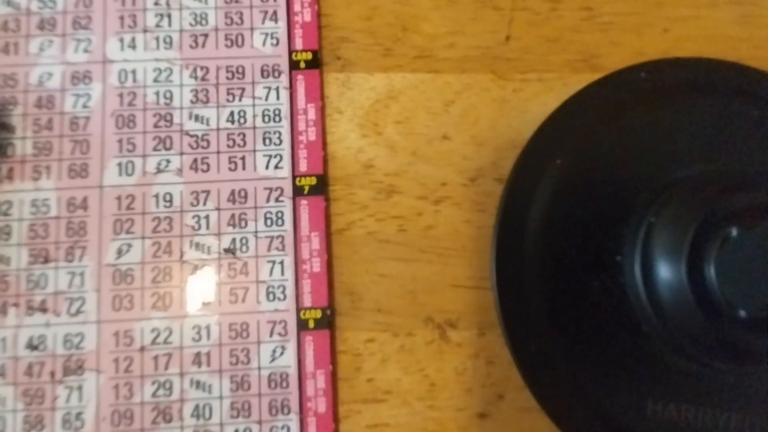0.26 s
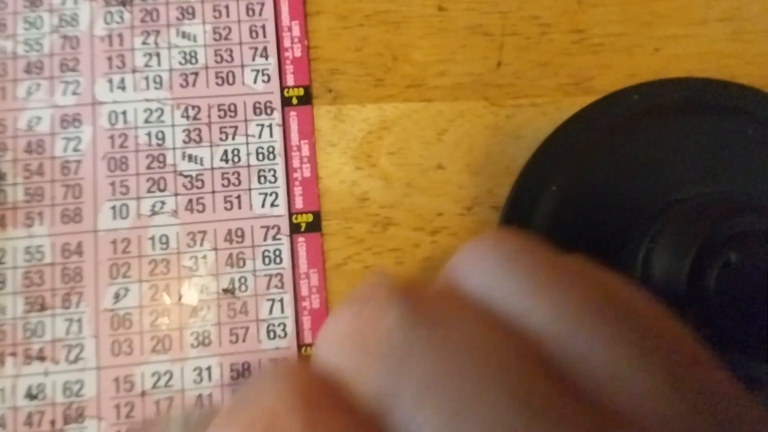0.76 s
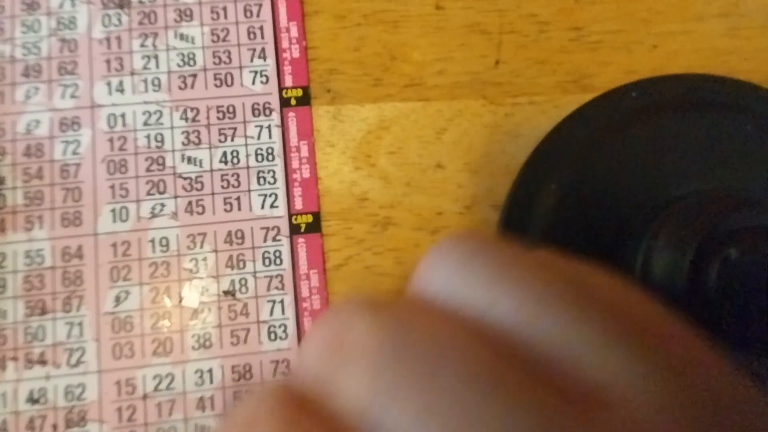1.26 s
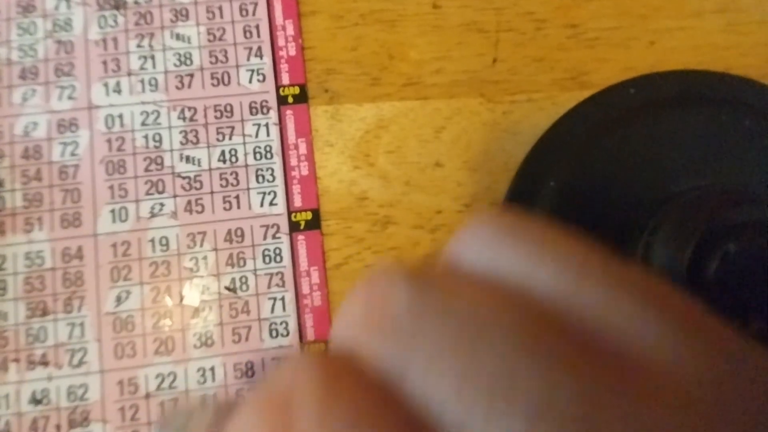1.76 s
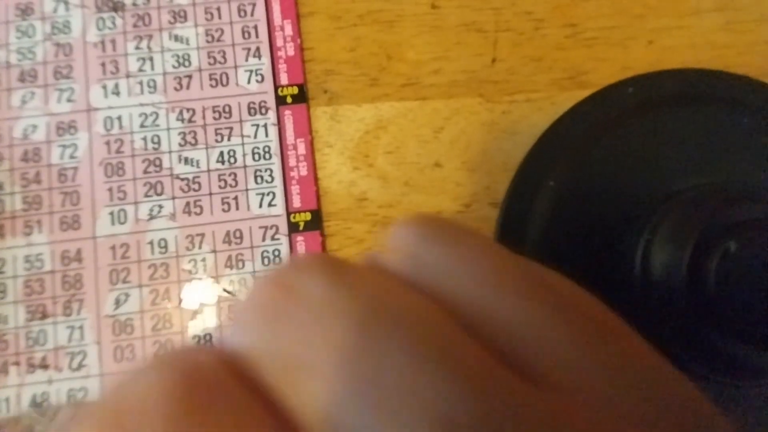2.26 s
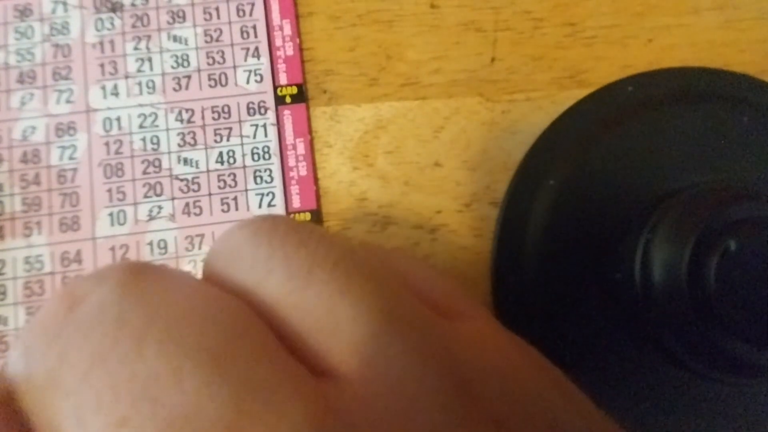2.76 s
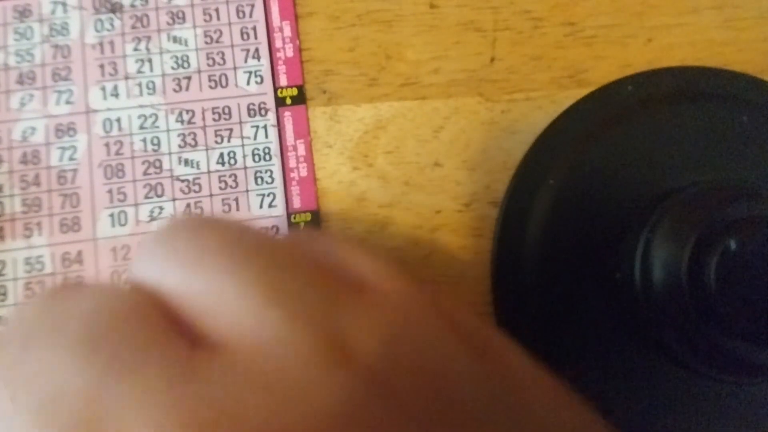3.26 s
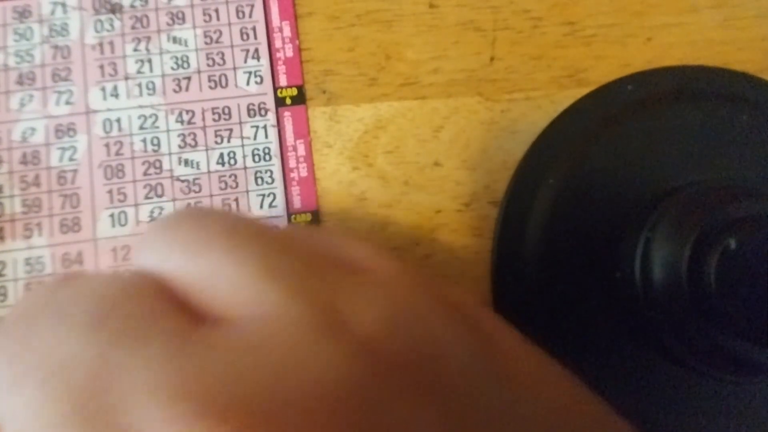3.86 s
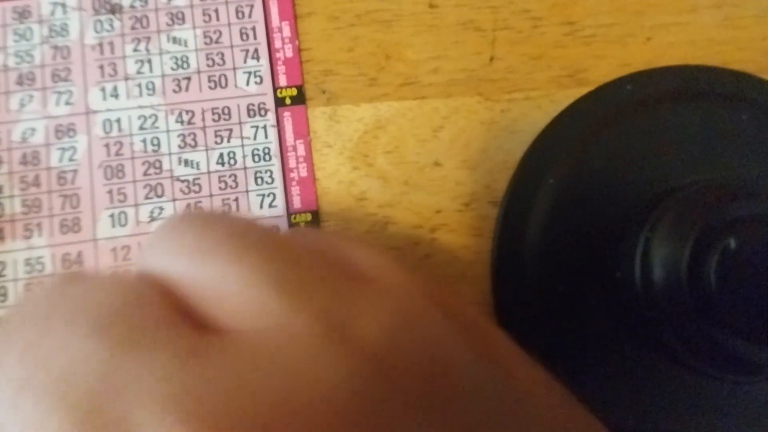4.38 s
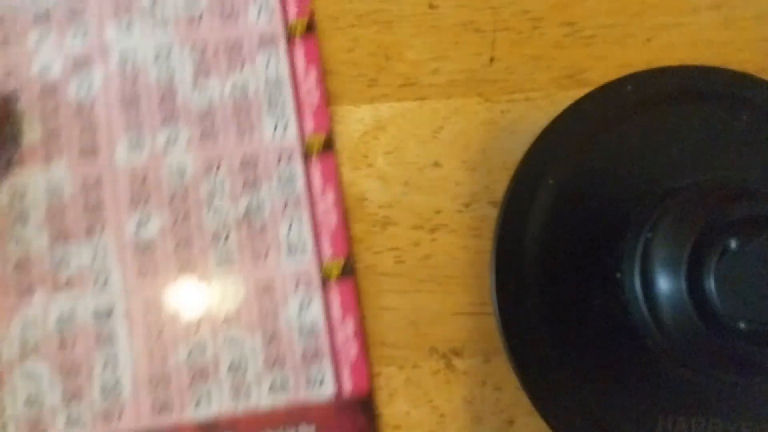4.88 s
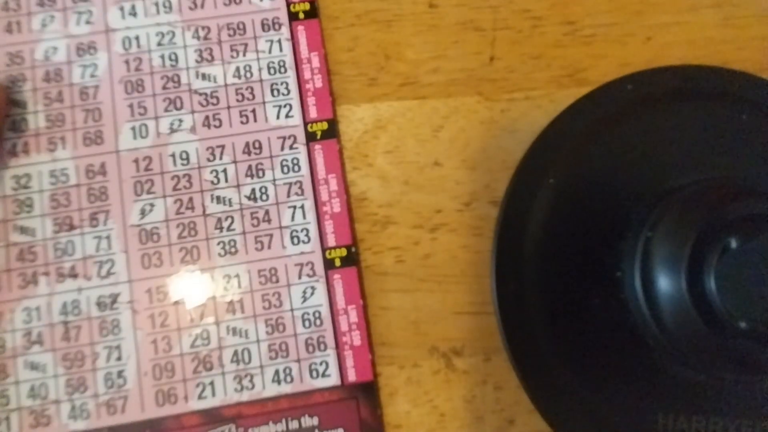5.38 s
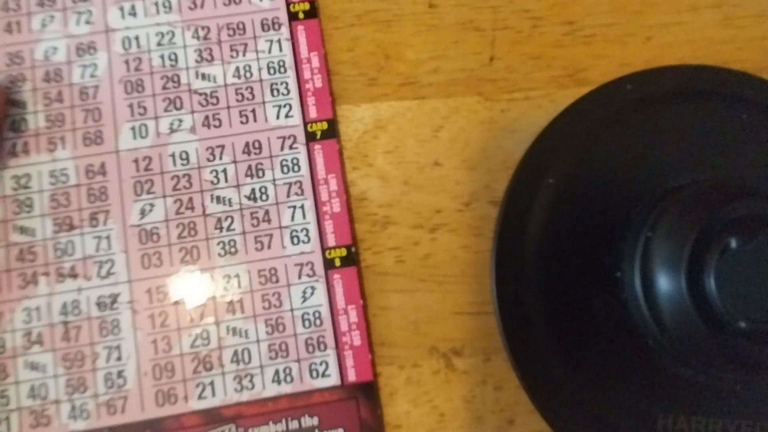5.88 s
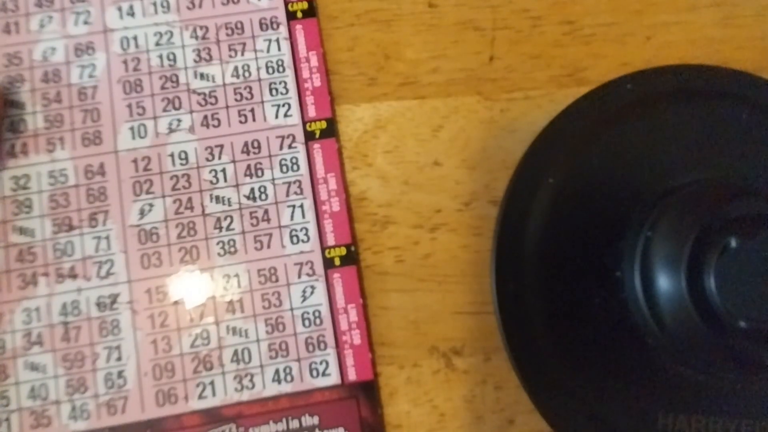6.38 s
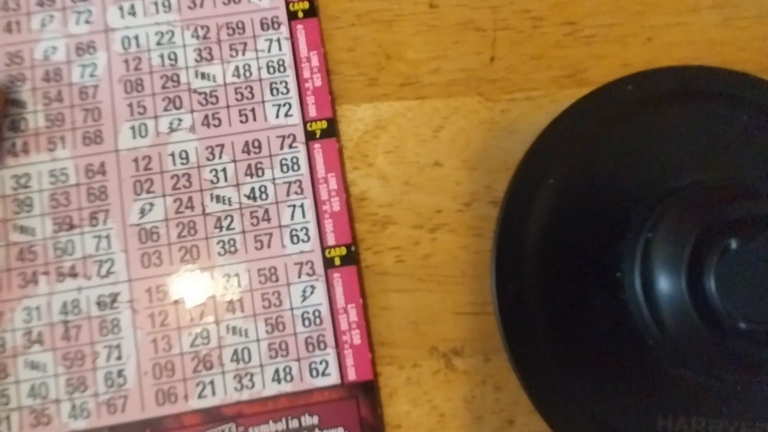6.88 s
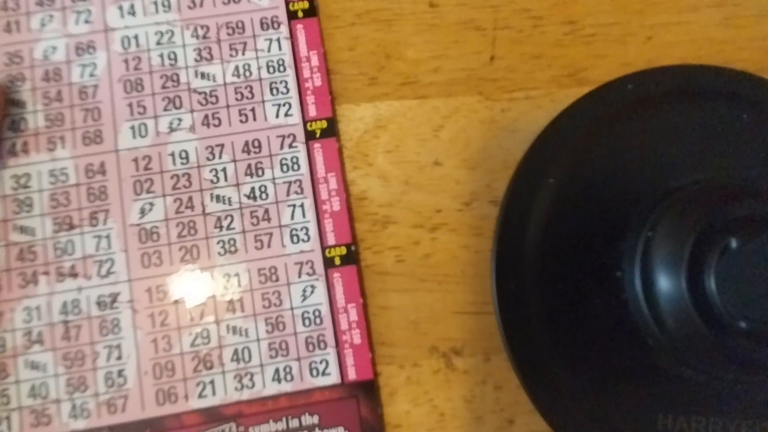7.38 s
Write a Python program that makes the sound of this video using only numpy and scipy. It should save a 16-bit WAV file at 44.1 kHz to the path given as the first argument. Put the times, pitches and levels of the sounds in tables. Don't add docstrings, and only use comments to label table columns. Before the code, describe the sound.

A coin taps and snaps on a wooden table, scratches a coated card in two rapid bursts, then knocks and bumps over a low hum.

```python
import sys
import numpy as np
from scipy import signal
from scipy.fft import rfft, irfft, next_fast_len
from scipy.io import wavfile

SR = 44100
rng = np.random.default_rng(int(sys.argv[2]) if len(sys.argv) > 2 else 0)


def int16_out(signal):
    q = np.round(np.clip(np.atleast_2d(signal).T, -1, 1) * 32767)
    wavfile.write(sys.argv[1], SR, q.astype(np.int16))


def boost_factor(decibels):
    exponent = np.asarray(decibels, float) / 20
    return 10 ** exponent


N = 336483
SIZE = next_fast_len(N + SR // 2)
TIME = np.arange(N) / SR

# multiple_of_cycle, level_db (rms)
ENGINE_ORDERS = [(6, -60), (9, -68), (12, -69), (15, -65.5), (18, -58), (21, -76), (24, -54.0), (27, -66.5),
                 (28, -75.5), (29, -57.5), (30, -47.5), (31, -59), (32, -60.5), (33, -49.5), (35, -59.5),
                 (36, -73), (41, -74.5), (42, -72.5), (45, -65.5), (47, -62.5), (48, -70.5)]
# pitch_hz, level_db_per_hz
AIR_SPECTRUM = [(40, -88), (60, -81), (130, -80.5), (215, -73.5), (330, -81), (600, -90.5), (700, -100),
                (1000, -102), (1170, -110), (2150, -104), (2750, -108), (3200, -116), (4300, -117),
                (5800, -126)]
# pitch_hz, level_db_per_hz
HISS_SPECTRUM = [(3000, -135), (5800, -128), (6800, -123), (8580, -133), (12000, -128), (15000, -131),
                 (17000, -140)]
# pitch_hz, likeness (-1 to 1)
AIR_LIKENESS = [(50, -0.073), (110, 0.76), (200, 0.89), (330, 0.91), (640, 0.33), (1000, -0.084),
                (1410, -0.29), (3100, -.09), (7000, -0.18)]
# middle_s, length_s, level_db
TRAFFIC_SWELLS = [
    (0.855, 0.93, -63),
    (1.19, 0.17, -63.5),
    (2.202, .2, -64.5),
    (2.726, 0.4, -46.5),
    (3.513, 0.34, -53),
    (4.155, 0.41, -54.5),
    (4.91, .3, -50),
    (5.65, .2, -65.5),
    (6.504, 0.72, -59),
    (7.62, .15, -50.5),
]
# pitch_hz, t60_s
ROOM_T60 = [(200, 0.21), (1000, 0.3), (5000, 0.22), (14000, 0.21)]
# middle_s, length_s, level_db, brightness_db, body_db
DRAGS = [
    (1.24, 1.05, -89, 8, 0.5),
    (3.93, 1.22, -88, 4, 3),
    (.13, 0.18, -69.5, -1.5, 2.5),
    (3.24, 0.085, -65, -6, 10),
    (4.662, 0.09, -69, 5, 2),
    (4.732, 0.076, -70, 5, 1.5),
    (4.87, 0.1, -58, -1, -3),
    (4.935, .085, -58, -1, -7),
    (4.79, .05, -72, 3, 0),
    (2.241, 0.14, -74.5, -0.5, 5.5),
]
# start_s, level_db, fade_db_per_s, brightness_db, body_db
SKIDS = [
    (.5, -59.5, 157, 2.5, -13.5),
    (1.715, -62, 297, -5.5, -4.5),
    (3.2, -66.5, 900, -6, 9.5),
    (4.424, -69, 130, -13, 11.5),
    (6.24, -72.5, 269.5, -3.5, -4),
    (6.499, -68, 102.5, -8.5, 8.5),
    (6.78, -76, 89, -9, 5.5),
    (7.565, -71, 202.5, -2, -10),
]
# pitch_hz, level_db_per_hz
SLIDE_SPECTRUM = [(1100, -30), (1880, -14), (2600, -8), (3200, -4), (4200, -7), (5670, -4), (6760, 0),
                  (7600, -4), (8500, -16.5), (11000, -39.5), (18700, -120)]
# pitch_hz, level_db_per_hz
SHEEN_SPECTRUM = [(5000, -34), (8500, -9), (10600, -3.5), (12800, -0.5), (15000, -3.5), (16000, -10.5)]
# pitch_hz, level_db_per_hz
BODY_SPECTRUM = [(410, -30.5), (700, -1.5), (760, -16.5), (999, -12), (1190, -18), (2400, -15), (3200, -28),
                 (4160, -43), (7040, -120)]
# middle_s, length_s, level_db
RUBS = [
    (4.66, 0.12, -67),
    (7.12, .2, -79.5),
    (6.33, .15, -81.5),
]
# start_s, pitch_hz, peak_db, t60_s, left_right_db
PINGS = [(.4393, 900, -21, .016, -6), (.4415, 480, -26, .04, -9), (.4305, 700, -30, .025, -8),
         (.4455, 1250, -32, .02, -6), (.497, 3500, -54, .08, 0), (.698, 4800, -52, .012, 0),
         (3.197, 760, -24, .022, 0), (3.1985, 2050, -33, .018, 3), (3.199, 1600, -36, .04, 3),
         (4.644, 2000, -58, .015, 0), (4.809, 2600, -42, .008, 0), (4.836, 2300, -46, .015, 0),
         (6.4965, 1930, -48, .025, 0), (6.4965, 4300, -48, .01, 0), (6.55, 900, -50, .04, 0),
         (6.817, 2000, -61, .02, 0), (.793, 1200, -58, .02, 0), (3.456, 750, -42, .04, 0),
         (.821, 760, -46, .04, 0), (3.742, 1700, -50, .02, 0), (3.647, 1300, -50, .02, 0),
         (3.833, 1500, -50, .02, 0), (1.513, 1850, -50, .02, 0), (1.705, 2050, -45, .02, 0),
         (4.459, 1000, -46, .04, 0)]
# start_s, peak_db, body_db (over the peak), left_right_db
TICKS = [(.112, -46, 1.5, -1), (.162, -49, 2, -13), (.417, -50, 4, 8), (.4196, -54, 8, 0),
         (.4288, -30, -2, -2), (.439, -44, 14.5, 0.5), (.4444, -41, 7, 12), (.4732, -38, -1, -0.5),
         (.698, -65, 16.5, 10.5), (1.115, -52, -4, 7), (1.311, -45, -8, 4), (1.66, -55, -6, -4),
         (1.696, -46, -7, -5), (1.727, -43, -4, 11), (1.9971, -47, -3, 4.5), (3.1927, -41, 13, 3.5),
         (4.127, -54, 0, -2.5), (4.2537, -52, 0, -1), (4.332, -58, 4, 0), (4.427, -60, 3, 0),
         (3.41, -57, -9, 0), (.96, -58, 5, 0), (4.447, -56, -8, -9), (4.5156, -57, 0, -14),
         (4.527, -59, -10.5, -13), (4.622, -66, -3.5, -20.5), (4.6444, -54, 0.5, -18), (4.809, -38, 6, 4),
         (4.8265, -34.5, 3, 1.5), (6.496, -42, 3, -10.5), (6.523, -50, 0, -5.5), (7.058, -58.5, -2.5, -5),
         (7.5936, -54, -10.5, -0.5)]
# start_s, peak_db
CRACKLES = [(1.353, -53), (1.5054, -51), (1.5463, -53), (1.7673, -48.5), (1.86, -55.5), (1.938, -54),
            (4.102, -49), (4.1235, -56), (4.2096, -52), (4.2883, -47.5), (5.047, -55), (5.0868, -53),
            (5.128, -51.5), (5.228, -55.5), (5.4933, -53.5), (5.6, -52.5), (6.341, -55), (6.359, -52.5),
            (6.397, -57.5), (6.4358, -58), (6.5713, -48), (6.5953, -47), (6.6366, -54), (6.845, -55),
            (6.863, -50), (6.957, -63), (7.1165, -59.5)]
# start_s, peak_db
GRIT = [(3.3694, -57), (3.4572, -59.5), (3.626, -64), (3.652, -61), (3.7276, -62), (3.7402, -54),
        (3.8457, -58), (4.7744, -62), (6.7844, -65.5), (7.5717, -62)]
# start_s, knock_db, thud_db, clatter_db, softness_hz (lower is softer)
BLOWS = [(.4208, -28, -36, -38, 500), (0.429, -31, -48, -36, 2470), (0.439, -26, -50, -33, 2750),
         (0.445, -41, -41, -51, 2000), (0.4483, -38.5, -60, -40.5, 1210), (0.4931, -50, -56, -34, 1500),
         (0.794, -60, -52.5, -62, 1480), (0.82, -43, -40, -51, 1100), (1.995, -55, -63.5, -58, 2500),
         (3.1963, -27.5, -49, -31, 2600), (4.459, -31.5, -43, -36, 1180), (4.468, -35.5, -45.5, -47, 710),
         (4.809, -40, -60, -53, 4000), (4.83, -28.5, -64, -40.5, 1510), (4.837, -44, -56.5, -46, 3520),
         (4.845, -28, -28, -44.5, 790), (5.065, -45, -36.5, -61, 400), (6.312, -53, -34, -72, 410),
         (6.497, -51, -62.5, -50, 4140), (6.5248, -17, -29, -44, 295), (6.5353, -20, -51, -37, 300),
         (6.552, -51, -45, -51.5, 1500), (6.568, -42, -33, -49.5, 600), (6.817, -52, -38.5, -53, 399)]
# pitch_hz, level_db, t60_s
TABLE_MODES = [(222.3, -1.5, 0.074), (328, 1.5, 0.011), (623, -6, 0.06), (1290, -21.5, 0.0077),
               (1770, -6, 0.021), (2037, -8.5, 0.03)]
# pitch_hz, level_db, t60_s
THUD_MODES = [(77, -16.5, .1), (109.5, -4.5, 0.15), (145, -6, .08)]
# pitch_hz, level_db, t60_s
CARD_RING_MODES = [(345, -6, .1), (694, -9, .06), (937, -8, .07), (1007, -3, .12), (1200, -12, .05),
                   (1450, -10, .03), (1680, -8, .04), (1900, -6, .025), (2190, -2, .03), (2420, -13, .02)]
# pitch_hz, level_db, t60_s
SNAP_MODES = [(3900, -25, .006), (4670, -14, 0.0031), (5194, -23.5, .008), (6364, -14.5, 0.0067),
              (7010, 6, 0.0038), (8500, 3, .003), (9900, -3, 0.0077), (11370, 4.5, 0.0051),
              (13100, -14, 0.0052), (15000, -14, .005)]
# middle_s, length_s, rasp_db, tearing_db (over the rasp), card_mode_hz (under the coin)
STROKES = [(.836, .047, -58, -11, 1580), (.94, .092, -53.5, -8, 2100), (1.042, .076, -53.5, -12, 1650),
           (1.138, .079, -51.5, -7, 1750), (1.239, .085, -47, -12, 1500), (1.329, .053, -46.5, -8, 1900),
           (1.43, .079, -54.5, -12, 1600), (1.53, .061, -52.5, -7, 1850), (1.62, .065, -50.5, -12, 1700),
           (1.718, .068, -49.5, -7, 2050), (1.811, .073, -56.5, -12, 1640), (3.357, .086, -58, 0, 2300),
           (3.457, .044, -55, -6, 1500), (3.555, .069, -55.5, -1, 1870), (3.656, .051, -51, -7, 1750),
           (3.76, .063, -51, -1, 2000), (3.852, .052, -51.5, -6, 1500), (3.96, .058, -54.5, -1, 1600),
           (4.057, .066, -54, -5, 1630), (4.163, .065, -53.5, 0, 2100), (4.249, .048, -52, -6, 1550),
           (4.35, .039, -57, -1, 1950)]
# pitch_hz, level_db_per_hz
RASP_SPECTRUM = [(290, 3), (500, 0.5), (822, -8.5), (1010, -1.5), (1170, -3), (1550, -3.5), (1990, -6),
                 (2200, -7), (3200, -14), (4160, -67), (7040, -120)]
# pitch_hz, level_db_per_hz
BITE_SPECTRUM = [(1760, -42.5), (3000, -29), (3310, -3), (5140, -2), (6090, -5.5), (7510, -2),
                 (8050, -18.5), (8760, -5), (9730, -23), (10500, -9), (11800, -12.5), (13500, -18),
                 (16000, -14.5)]
# pitch_hz, width_hz, upper_patch_db, lower_patch_db, extra_on_push_db
CARD_MODES = [
    (787.1, 193, 6, -1, -3),
    (1006.7, 26, -10, -12, 6),
    (2250, 142, -8, -8, 3),
]
# pitch_hz, width_hz, level_db
MICROPHONE = [
    (1147, 120, -4.5),
    (3250, 1800, -5),
    (4380, 1000, 5.5),
    (8670, 1200, -7.5),
]


def rms_one(x):
    return x / np.sqrt(np.mean(x ** 2) + 1e-20)


def at_hz(points, hz):
    return np.interp(np.log(hz + 1), np.log(np.array(points)[:, 0]), np.array(points)[:, 1])


def coloured(x, spectrum):
    gain = boost_factor(at_hz(spectrum, np.fft.rfftfreq(SIZE, 1 / SR)))
    return irfft(rfft(x, SIZE) * gain, SIZE)[..., :N]


def drift(rate):
    r = np.exp(-80 * np.pi * rate / SR)
    slow = signal.lfilter([1], [1, -2 * r, r * r], rng.standard_normal(N // 40 + 2002))[2000:]
    return np.interp(np.arange(N) / 40, np.arange(len(slow)), rms_one(slow))


def hump(middle, width, squareness):
    out = np.zeros(N)
    near = slice(max(round((middle - 6 * width) * SR), 0), round((middle + 6 * width) * SR))
    out[near] = np.exp(-.5 * np.abs((TIME[near] - middle) / width) ** squareness)
    return out


def ring(clicks, modes):
    out = 0
    for hz, db, t60 in modes:
        r, w = boost_factor(-60 / (t60 * SR)), 2 * np.pi * hz / SR
        out = out + signal.lfilter([0, boost_factor(db) * np.sin(w)], [1, -2 * r * np.cos(w), r * r], clicks + 1e-18)
    return out


def resonance(x, hz, width_hz):
    r = np.exp(-np.pi * width_hz / SR)
    poles = [1, -2 * r * np.cos(2 * np.pi * hz / SR), r * r]
    return signal.lfilter([(1 - r * r) / 2, 0, (r * r - 1) / 2], poles, x)


def grains(per_s, spread_db):
    sizes = boost_factor(spread_db * np.minimum(rng.exponential(1, N), 5)) * rng.choice([-1, 1], N)
    return rms_one(sizes * (rng.random(N) < per_s / SR))


def left_right(pan_db):
    return np.array([[pan_db / 2], [-pan_db / 2]])


def ports(x, left_late_s, pan_db):
    left = np.interp(TIME - left_late_s, TIME, x)
    return np.array([left * boost_factor(pan_db / 2), x * boost_factor(-pan_db / 2)])


def engine():
    cycle_hz, crest_s = 6.878, -.0119
    wall_mode_hz, wall_half_width_hz, wall_lag = 235, 12, 1.5
    turn = 2 * np.pi * cycle_hz * (TIME - crest_s + .0001 * drift(1.0))
    order, db = np.transpose(ENGINE_ORDERS)
    lag = wall_lag * (np.arctan((order * cycle_hz - wall_mode_hz) / wall_half_width_hz) + np.pi / 2)
    hum = sum(boost_factor(level) * np.cos(k * turn - late) for k, level, late in zip(order, db, lag))
    return -np.sqrt(2) * hum * boost_factor(.5 * drift(1.5))


def air():
    rumble_bed_db = -64.5
    mid, side = rfft(rng.standard_normal((2, N)), SIZE)
    alike = np.clip(at_hz(AIR_LIKENESS, np.fft.rfftfreq(SIZE, 1 / SR)), -.9, .99)
    pair = irfft(np.sqrt(1 + alike) * mid + np.sqrt(1 - alike) * side * [[1], [-1]], SIZE)[:, :N]
    per_hz = np.sqrt(SR / 2)
    hiss = coloured(rng.standard_normal((2, N)), HISS_SPECTRUM) * boost_factor(5.5)
    low = signal.sosfilt(signal.butter(2, [50, 85], "band", fs=SR, output="sos"), pair)
    swell = boost_factor(rumble_bed_db - 6)
    for middle, length, db in TRAFFIC_SWELLS:
        swell = swell + boost_factor(db - 8.5) * hump(middle, 0.56 * length, 2)
    return per_hz * (coloured(pair, AIR_SPECTRUM) * boost_factor(drift(6)) + hiss) + swell * rms_one(low)


def room(x):
    t, tail = TIME[:SR // 2], 0
    for hz in 150 * 2. ** np.arange(7):
        edges = [hz / np.sqrt(2), hz * np.sqrt(2) * (1 + 0.1 * (hz > 9000))]
        band = signal.butter(2, edges, "band", fs=SR, output="sos")
        noise = signal.sosfilt(band, rng.standard_normal((2, len(t))))
        tail = tail + noise * boost_factor(-60 * t / at_hz(ROOM_T60, hz))
    tail = tail * np.clip(t / .007, 0, 1)
    tail = tail / np.sqrt(np.sum(tail ** 2) / 2)
    return irfft(rfft(x, SIZE) * rfft(tail, SIZE), SIZE)[:, :N]


def sliding():
    drag_width, drag_squareness, skid_attack_s = .45, 4.0, .006
    gains = np.zeros((3, N))
    for middle, length, db, bright_db, body_db in DRAGS:
        shape = hump(middle, drag_width * length, drag_squareness)
        gains += shape * boost_factor(db + np.array([[0], [bright_db], [body_db]]))
    for s, db, fade, bright_db, body_db in SKIDS:
        shape = np.clip((TIME - s) / skid_attack_s, 0, 1) * boost_factor(-fade * np.abs(TIME - s))
        gains += shape * boost_factor(db + np.array([[0], [bright_db], [body_db]]))
    friction = np.array([grains(9000, 3.3), grains(9000, 3.3)])
    out = 0
    for colour, gain in zip((SLIDE_SPECTRUM, SHEEN_SPECTRUM, BODY_SPECTRUM), gains):
        out = out + rms_one(coloured(friction, colour)) * gain * boost_factor(1.5 + 1.5 * drift(48))
    return out


def rubbing():
    rub_hz, rub_width_hz = 4200, 700
    gain = sum(boost_factor(db) * hump(middle, 0.28 * length, 1.8) for middle, length, db in RUBS)
    hiss = resonance(rng.standard_normal((2, N)), rub_hz, rub_width_hz)
    return gain * rms_one(resonance(hiss, rub_hz, rub_width_hz))


def crackles():
    out, t = np.zeros((2, N)), TIME[:160]
    bright = signal.butter(2, [10200, 14800], "band", fs=SR, output="sos")
    body = signal.butter(2, [3400, 7800], "band", fs=SR, output="sos")
    thin = [(s, db, -9, -10) for s, db in CRACKLES]
    dull = [(s, db, 6, 3) for s, db in GRIT]
    rows = TICKS + thin + dull
    for (s, db, body_db, pan_db), noise in zip(rows, rng.standard_normal((len(rows), 2, 160))):
        burst = noise * np.exp(-t / .0009)
        top, low = signal.sosfilt(bright, burst), signal.sosfilt(body, burst)
        tick = top / np.abs(top).max() + low / np.abs(low).max() * boost_factor(body_db)
        i = round(s * SR)
        out[:, i:i + 160] += tick * boost_factor(db + 0.5 + left_right(pan_db))
    return out


def pings():
    out, t = np.zeros((2, N)), TIME[:6000]
    for s, hz, db, t60, pan_db in PINGS:
        i = round(s * SR)
        out[:, i:i + 6000] += boost_factor(db - 60 * t / t60 + left_right(pan_db)) * np.sin(2 * np.pi * hz * t)
    return out


def blows():
    loose_ring_db, pinned_ring_db = -27.5, 5
    pinned_from_s, pinned_to_s = 3.1, 3.3
    edge_db, edge_db_per_octave, edge_s = -10.5, 4.5, .0012
    push, clatter, t = np.zeros((3, N)), np.zeros((2, N)), TIME[:3000]
    edge = signal.butter(2, [1400, 2900], "band", fs=SR, output="sos")
    noises = rng.standard_normal((len(BLOWS), 2, 3000))
    for (s, knock_db, thud_db, clatter_db, soft_hz), noise in zip(BLOWS, noises):
        pinned = pinned_from_s < s < pinned_to_s
        ring_db = clatter_db + (pinned_ring_db if pinned else loose_ring_db)
        contact = t * np.exp(-2 * np.pi * soft_hz * t)
        i = round(s * SR)
        push[:, i:i + 3000] += boost_factor(np.array([[knock_db], [thud_db], [ring_db]])) * contact / contact.sum()
        hard_db = clatter_db + edge_db + edge_db_per_octave * np.log2(soft_hz / 1000)
        hard_edge = signal.sosfilt(edge, noise * np.exp(-t / edge_s))
        clatter[:, i:i + 3000] += boost_factor(hard_db + 14.5) * hard_edge
        band = signal.butter(2, [380, 700 + 0.14 * soft_hz], "band", fs=SR, output="sos")
        rattle = noise * (1 - np.exp(-t / .0007)) * (np.exp(-t / .0035) + .15 * np.exp(-t / .014))
        clatter[:, i:i + 3000] += boost_factor(clatter_db + 19.5) * signal.sosfilt(band, rattle)
    knock, thud, card = push
    low = ring(thud, THUD_MODES) + ring(knock, TABLE_MODES[:2])
    upper = ring(knock, TABLE_MODES[2:]) + ring(card, CARD_RING_MODES)
    return -low - ports(upper, 0.0011, -0.18) + clatter * boost_factor([[-2.5], [2.5]])


def snap():
    snap_s, snap_db = .4919, -14
    clicks, i = np.zeros(N), round(snap_s * SR)
    clicks[i + np.array([0, 6, 13, 37, 50, 62])] = np.array([.4, 0.72, .6, 0.33, 0.076, 0.44])
    return ports(boost_factor(snap_db) * ring(clicks, SNAP_MODES), 16 / SR, -6.5)


def scraping():
    patch_change_s = 2.5
    push_tear_lead_s, pull_tear_share = .006, .8
    stroke_pan_db, pan_per_bite = 5, 0.54
    contact_width_hz, contact_db = 220, 6.5
    tear_hz, tear_width_hz, tear_db = 5220, 880, -5

    rasp_gain, bite_gain, pan_db, pushing = np.zeros((4, N))
    for k, (middle, length, rasp_db, bite_db, _) in enumerate(STROKES):
        is_push = k % 2
        if is_push:
            tear = hump(middle - push_tear_lead_s, .31 * length, 2.6)
        else:
            tear = hump(middle, .31 * length * pull_tear_share, 2.6)
        speed = hump(middle, 0.3 * length, 2.3)
        rasp_gain += speed * boost_factor(rasp_db)
        bite_gain += tear * boost_factor(rasp_db + bite_db)
        pan_db += speed * (stroke_pan_db + pan_per_bite * bite_db)
        pushing += is_push * hump(middle + .015, .045, 4)

    lower = TIME > patch_change_s
    chatter = boost_factor(3.0 * drift(90))
    left_late_s = np.where(lower, .00127, .00054) + .00008 * drift(3.6)
    shared = ports(grains(2500, 3.6), left_late_s, 0)
    own = np.array([grains(4000, 3), grains(4000, 3)])
    catches = chatter * (shared + np.where(lower, 1.2, .8) * own)

    rasp = rms_one(coloured(catches, RASP_SPECTRUM)) * rasp_gain
    shake = boost_factor(-26) * ring(rms_one(catches.sum(axis=0)) * rasp_gain, THUD_MODES)
    contact = np.zeros((2, N))
    for middle, _, _, _, hz in STROKES:
        span = slice(round((middle - .05) * SR), round((middle + .05) * SR))
        window = signal.windows.tukey(span.stop - span.start, .5)
        contact[:, span] += resonance(rasp[:, span], hz, contact_width_hz) * window
    card = 0
    for hz, width_hz, upper_db, lower_db, push_db in CARD_MODES:
        mode_db = 12.5 + 2.7 * drift(7) + push_db * pushing + np.where(lower, lower_db, upper_db)
        card = card + resonance(rasp, hz, width_hz) * boost_factor(mode_db)
    rasp = rasp * 1.53 + boost_factor(contact_db) * contact + card

    tearing = 1.3 * catches + rng.standard_normal((2, N)) * boost_factor(2.5 * drift(120))
    bite = rms_one(coloured(tearing, BITE_SPECTRUM)) * bite_gain
    bite = bite + boost_factor(tear_db) * pushing * resonance(bite, tear_hz, tear_width_hz)
    return (rasp + bite) * boost_factor(pan_db * [[.5], [-.5]] - 3.5) + shake


def scene():
    slide = sliding() + rubbing()
    ticks = crackles()
    knocks = blows() + pings()
    crack = snap()
    scrape = scraping()
    send = boost_factor(-9.5) * scrape + boost_factor(-10.5) * knocks + boost_factor(-12) * crack + boost_factor(-11.5) * ticks + boost_factor(-7) * slide
    return scrape + knocks + crack + ticks + slide + room(send.mean(axis=0)) + engine() + air()


def top_cut(x):
    return signal.sosfilt(signal.butter(12, 17030, fs=SR, output="sos"), x)


def record(dry):
    for hz, width_hz, db in MICROPHONE:
        dry = dry + (boost_factor(db) - 1) * resonance(dry, hz, width_hz)
    dry = signal.sosfilt(signal.butter(6, 40, "high", fs=SR, output="sos"), dry)
    mix = signal.sosfilt(signal.cheby2(10, 60, 17000, fs=SR, output="sos"), np.clip(dry, -1, 1))
    return top_cut(mix)


dry = scene()
out = record(dry)
int16_out(out)
```